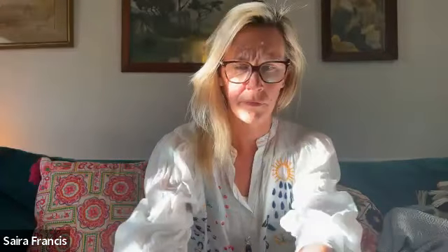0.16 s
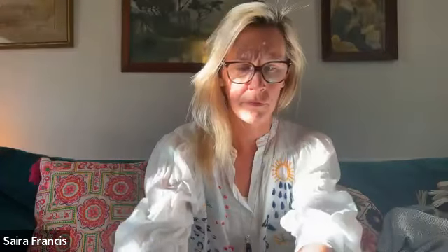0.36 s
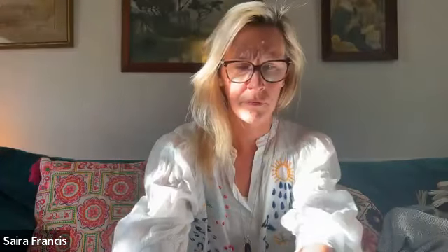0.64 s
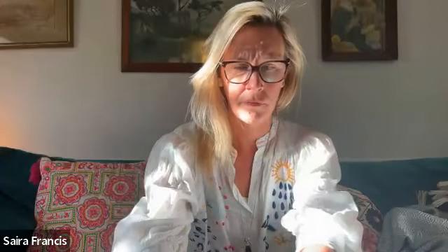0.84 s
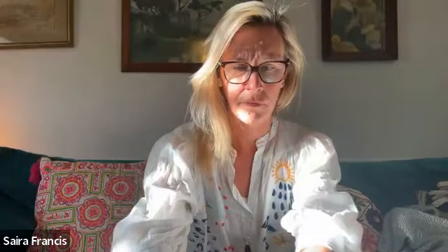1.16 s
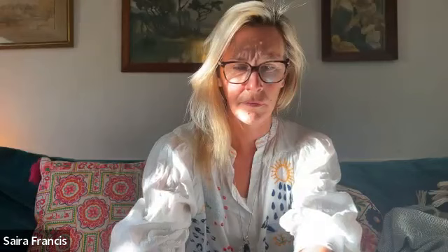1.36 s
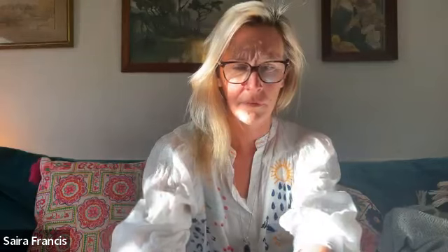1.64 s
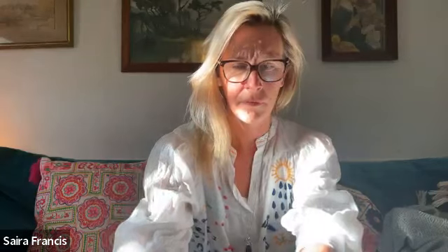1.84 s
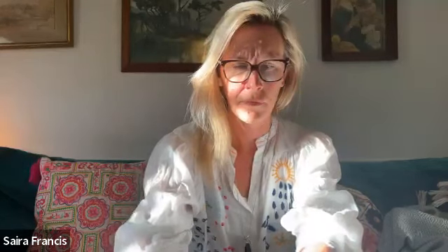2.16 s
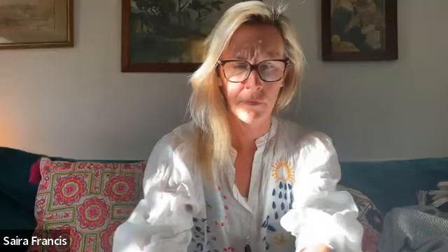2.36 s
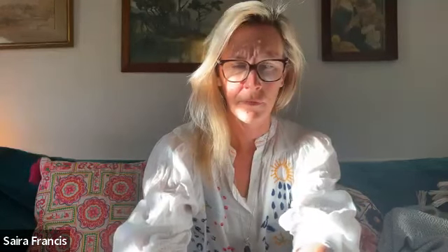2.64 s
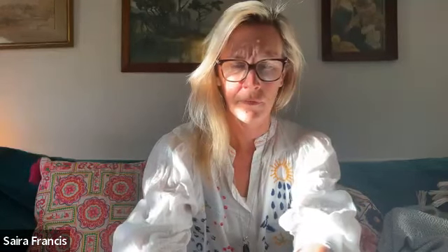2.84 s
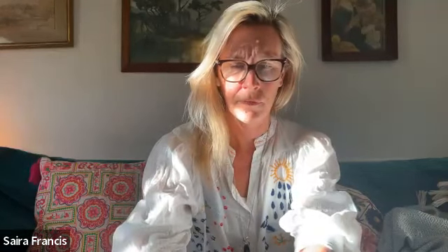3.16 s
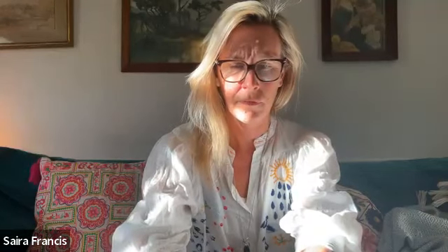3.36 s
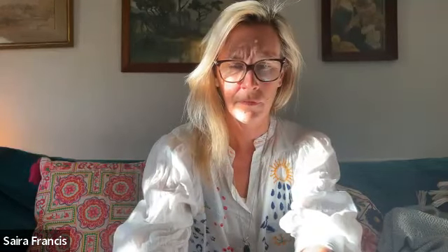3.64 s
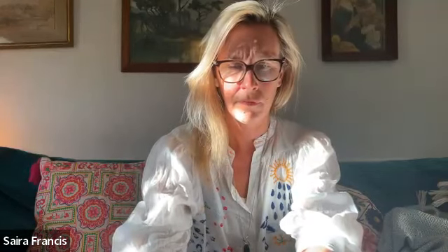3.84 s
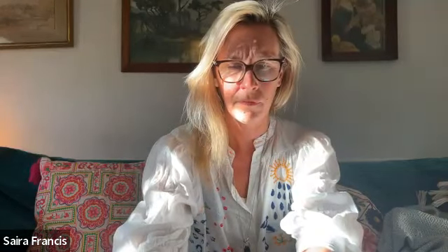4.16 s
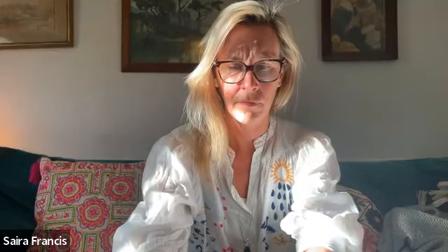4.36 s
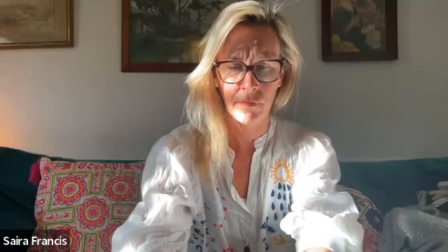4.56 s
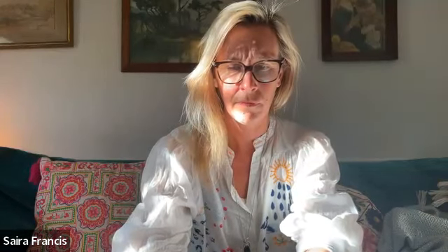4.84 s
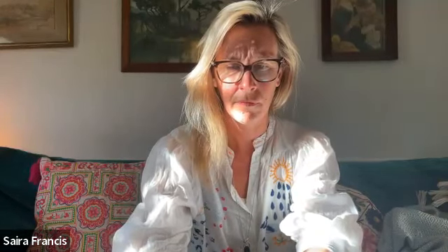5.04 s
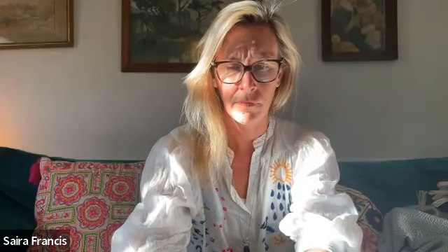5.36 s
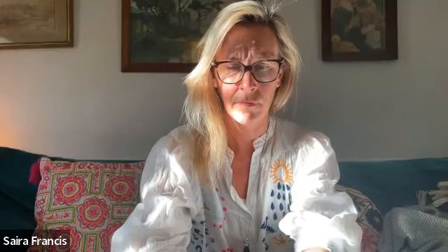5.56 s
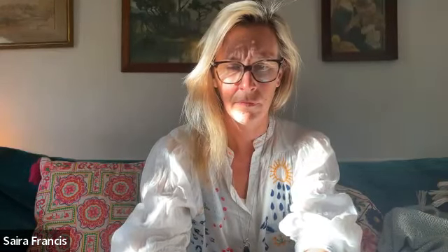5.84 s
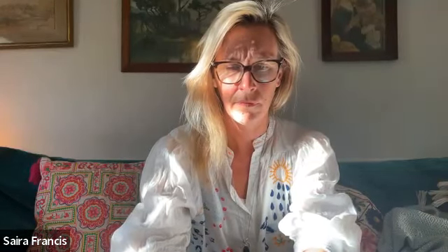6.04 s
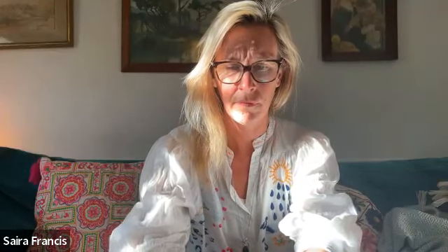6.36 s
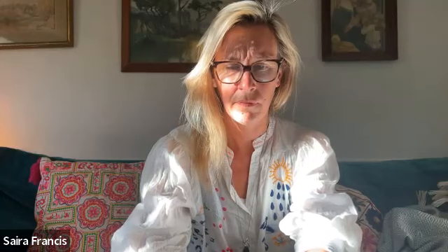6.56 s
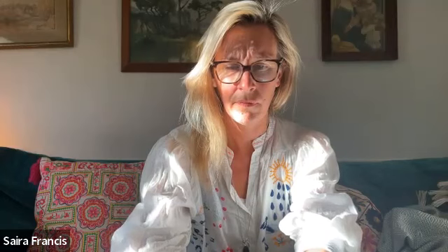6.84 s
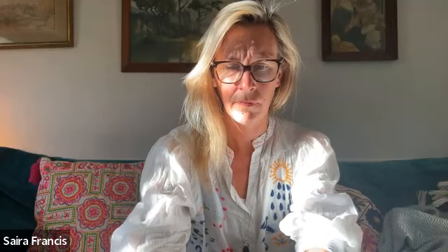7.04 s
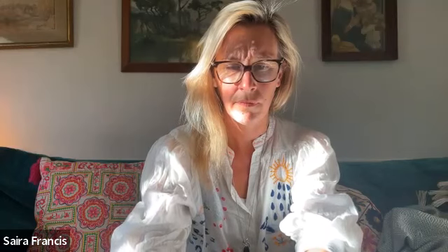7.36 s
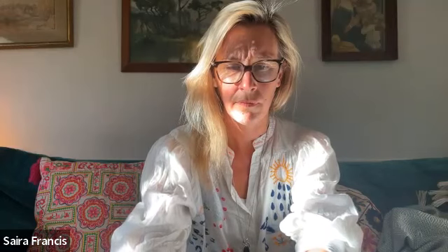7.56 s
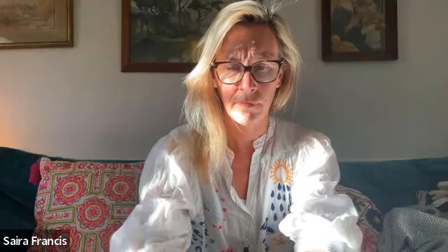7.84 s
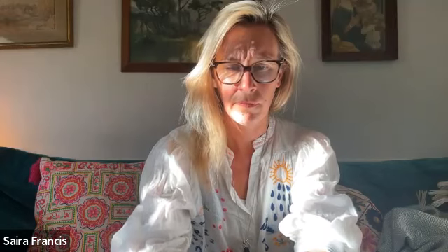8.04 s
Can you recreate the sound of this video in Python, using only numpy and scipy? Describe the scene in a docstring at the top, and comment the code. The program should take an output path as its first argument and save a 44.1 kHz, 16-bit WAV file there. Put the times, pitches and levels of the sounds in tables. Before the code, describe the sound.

A laptop keyboard is typed quickly up close, soft thumps and plastic clacks in bursts, broken by short runs of dry, evenly repeated clicks.

```python
"""Laptop keys typed close to the microphone in a small furnished room.
Ordinary keystrokes ring the modes of the hollow case and clack and rattle the caps with gritty noise.
Three times a crisp, dry key is tapped in a quick run, each tap built from a touch, press, lift and release.
Behind them lie a faint rapid ticking of narrow-band clicks that slowly runs down, and a quiet hum
of filtered noise."""
import sys
import numpy as np
from scipy import signal
from scipy.fft import rfft, irfft
from scipy.io import wavfile
from scipy.ndimage import uniform_filter1d

SR = 44100
rng = np.random.default_rng(int(sys.argv[2]) if len(sys.argv) > 2 else 0)


def unload_wav(signal):
    """Save mono or channel-first audio to the path in sys.argv[1] as 16-bit WAV at rate SR, clipped to [-1, 1]."""
    wavfile.write(
        sys.argv[1],
        SR,
        np.round(np.clip(np.atleast_2d(signal).T, -1, 1) * 32767).astype(np.int16),
    )


N = 361619

# Ordinary keystrokes. Each row: time of impact in seconds, strength in dB,
# hardness (cap clack over case thump) in dB, pitch of the struck spot in Hz.
STROKES = [(0.0315, -35.5, -5, 318), (1.632, -69, 11, 325), (1.7188, -38.5, 2.5, 328), (1.725, -40, 1, 292),
           (1.834, -35.5, 6.5, 403), (1.8644, -40.5, -6, 230), (2.1824, -30, -7.5, 280),
           (2.2625, -34.5, -12.5, 297), (2.3319, -34, -17.5, 240), (2.3897, -23, 2.5, 237),
           (2.4414, -36.5, -6, 258), (2.5, -33.5, -3.5, 260), (2.715, -38.5, 8, 396),
           (2.8033, -46.5, 12, 320), (2.8727, -29.5, -9, 313), (2.905, -40.5, -3, 253),
           (3.019, -26.5, 3, 272), (3.1186, -36, -4, 240), (3.2008, -36.5, -8, 420),
           (3.3166, -43.5, -3, 407), (3.581, -40.5, 7.5, 120), (3.6288, -35.5, -4.5, 320),
           (3.7042, -29, 4, 317), (3.7989, -38.5, -10.5, 350), (4.4975, -37.5, -6.5, 297),
           (4.5811, -30.5, 0.5, 335), (4.6132, -42, 2.5, 280), (4.6729, -36.5, -1.5, 344),
           (4.795, -33, -13, 244), (5.043, -34.5, 7, 371), (5.2077, -28.5, -7.5, 244),
           (5.3256, -31, -0.5, 364), (5.452, -28, -2, 253), (5.5393, -31, -4, 275), (5.6122, -30.5, 5, 506),
           (5.6552, -26, -7.5, 306), (5.7126, -29, -7.5, 286), (5.8139, -36, -4.5, 266),
           (5.9642, -49, 14, 408), (5.972, -34.5, -5, 424), (6.088, -40, 3.5, 344),
           (6.1147, -30.5, -2, 303), (6.213, -50.5, 9.5, 232), (6.2964, -24, -7.5, 370),
           (6.3491, -31, -0.5, 443), (6.4873, -29.5, -11, 215), (6.568, -42.5, 2, 285),
           (6.5818, -37.5, -6, 240), (6.6486, -23.5, -12, 363), (6.687, -19.5, -8, 296),
           (6.821, -27.5, -3.5, 290), (6.9384, -34.5, -3.5, 268), (7.603, -53.5, 10, 300),
           (7.8764, -44, 3, 403), (7.962, -24, -5.5, 394), (8.0244, -34.5, -14.5, 333),
           (8.1008, -27, -5, 280), (8.1541, -22, 2, 282)]
# Soft fingertips landing with barely a click. Each row: time of impact in seconds, strength in dB,
# pitch of the struck spot in Hz.
THUDS = [(1.4015, -35.5, 398), (1.5331, -39.5, 400), (1.9362, -36.5, 447), (2.551, -37, 312),
         (2.6653, -39, 360), (2.8272, -40, 290), (2.972, -40.5, 230), (3.087, -37, 224),
         (4.9111, -38.5, 265), (5.119, -37, 336), (5.426, -38.5, 287), (5.68, -31, 433),
         (6.0236, -34.5, 400), (6.198, -39.5, 376), (6.467, -39, 330), (7.663, -49, 168.5),
         (7.888, -34, 406)]
# Modes of the case under ordinary keys. Each row: frequency in Hz, level in dB, 60 dB decay in seconds.
CASE_MODES = [(113.4, -7, 0.18), (154.8, -1, 0.15), (192.5, -1, 0.078), (262.2, -4.5, 0.14),
              (354, -1, 0.045), (432.3, 3, 0.04), (539, 0, 0.039)]
# Colour of the cap clack. Each row: frequency in Hz, level in dB.
CAP_COLOUR = [(350, -13.5), (760, -9), (1500, -0.5), (1950, 0), (2800, -8), (4000, -15.5), (9000, -59.5)]
# Colour of the contact tick. Each row: frequency in Hz, level in dB.
TICK_COLOUR = [(1800, -47), (3600, -10), (5000, 2.5), (8000, 0.5), (12000, 2), (16000, -4)]
# Taps on the crisp key. Each row: time of bottoming out in seconds, travel before it in seconds,
# time held down in seconds, touch level in dB, press level in dB, release level in dB, brightness in dB.
TAPS = [(0.4809, 0.0039, 0.064, -25, -27.5, -28.5, 5), (0.6248, 0.0086, 0.067, -41.5, -31.5, -27.5, -3.5),
        (.7368, 0.02, .0832, -53, -36, -29, -0.5), (0.8783, 0.013, 0.07, -54.5, -36, -30, -0.5),
        (1.004, 0.015, 0.075, -54.5, -35, -28, 1), (1.1385, .0092, 0.09, -47, -32.5, -27.5, 8.5),
        (4.1167, .0039, 0.049, -27, -26.5, -22, -1.5), (4.2582, 0.016, .058, -33.5, -29, -26, 2.5),
        (4.383, 0.016, .0688, -37.5, -30.5, -23, -1.5), (7.2212, 0.0062, 0.059, -31, -30.5, -28.5, 1),
        (7.359, 0.011, 0.061, -39, -31, -32, 2.5), (7.4911, 0.015, 0.065, -34.5, -30, -28, 5.5)]
# Case modes under the crisp key. Each row: frequency in Hz, level in dB, 60 dB decay in seconds.
SNAP_CASE_MODES = [(160, -17, .05), (280, -13, .025), (415, -2, .032), (500, -2, .012), (785, -3, .018)]
# Modes of the crisp key's cap. Each row: frequency in Hz, level in dB, 60 dB decay in seconds.
SNAP_CAP_MODES = [(980, -6, 0.0056), (2051, 0, 0.0091), (2636, -1, 0.006), (4510, -1.5, 0.0045)]
# Colour of the crisp key's tick. Each row: frequency in Hz, level in dB.
SNAP_TICK_COLOUR = [(1800, -34), (3600, -14), (6000, 2), (16000, -8)]
# Colour of the room hum. Each row: frequency in Hz, relative level in dB per Hz.
HUM_COLOUR = [(18, -44), (30, -18), (100, 4.5), (632, -10), (2290, -11), (16000, -31.5)]

# a stroke's contact tick: level against the thump, growth with hardness, fall at higher-pitched spots
TICK_DB, TICK_PER_HARDNESS, TICK_DB_PER_OCTAVE, MID_SPOT_HZ = -4, 0.78, -6.5, 316
# a thud's dull clack against its thump, rising at higher-pitched spots; its trace of a tick against that clack
THUD_CLACK_DB, THUD_DB_PER_OCTAVE, THUD_TICK_DB = -9.5, 10, -22.5
# what each part of a tap excites: case thump dB, cap clack dB, contact tick dB, share of the tap's brightness
TOUCH, PRESS, RELEASE = (-10, 1, 4.5, -0.66), (1.5, -4.5, -8.5, 0.42), (-6, 1.74, -6.5, 1.47)
# the cap creaks faintly as the finger starts to lift: seconds before the release, and what it excites, as above
LIFT_S, LIFT = .016, (-35.5, -26.5, -25.5, -0.5)
TICKING_START_S, TICKING_PER_S, SLOWING_PER_S2 = .162, 27.05, .52
TICKING_DB, FADE_DB_PER_S = -66.5, 1.3
HUM_DB = -72.5
TOP_HZ = 16100
LEAD = 768  # samples ahead of the impact in each stroke
T = np.arange(8192) / SR  # time within one stroke, s


def keystrokes():
    """Each stroke thumps the case and clacks a cap, which rattles briefly on its hinge."""
    out = np.zeros(N)
    for s, thump_db, clack_db, tick_db, hz in blows():
        # the struck spot favours the case modes near its own pitch
        favour_db = -9 * np.abs(np.log2(np.array(CASE_MODES)[:, 0] / hz))
        case = ring(CASE_MODES, detune=0.055, weight_db=favour_db, spread=0.49)
        thump = unit(through(push(.0001), case))
        thump += undb(-8) * unit(band(shiver(0.015), 180, 500))
        # the louder the clack, the more the whole base rocks
        base = ring([(70, 0, 0.071)], detune=0.072)
        thump += undb(.5 * clack_db - 2.5) * unit(through(push(.001), base))

        # a hard stroke is one crack; a light one is mostly rattle
        looseness = min(undb(-.5 * (tick_db + 47.5)), 1)
        cluster = rattle(early_s=.007, late_s=.02, count=6)
        crack = contact(0.00029, 0.00028, grit=0.33)
        scuff = contact(.0025, 0.0027, grit=0.4)
        force = crack + undb(1.0) * scuff + looseness * cluster

        deck = shiver(0.016)
        # the less tick in a stroke, the duller its clack
        soft_db = np.clip(0.53 * (tick_db - clack_db - 0.5), -9, 0)  # per octave
        clack = colour(unit(force) + undb(-14.0) * deck, CAP_COLOUR, scatter_db=4, tilt_db=soft_db)
        tick = colour(force, TICK_COLOUR, scatter_db=4.5)
        add(out, s, undb(thump_db) * thump + undb(clack_db) * unit(clack) + undb(tick_db) * unit(tick))
    return out + undb(-19) * room(out, t60_s=0.18, gap_s=0.053, lo_hz=88.5, hi_hz=14000)


def blows():
    """Strokes and thuds as (s, thump dB, clack dB, tick dB, Hz); harder strokes are brighter."""
    for s, db, hardness_db, hz in STROKES:
        octaves = np.log2(hz / MID_SPOT_HZ)
        tick_db = TICK_DB + TICK_PER_HARDNESS * hardness_db + TICK_DB_PER_OCTAVE * octaves
        yield s, db, db + hardness_db, db + tick_db, hz
    for s, db, hz in THUDS:
        clack_db = db + THUD_CLACK_DB + THUD_DB_PER_OCTAVE * np.log2(hz / MID_SPOT_HZ)
        yield s, db, clack_db, clack_db + THUD_TICK_DB, hz


def rattle(early_s, late_s, count):
    """Small knocks of a loose cap, scattered around the impact, each with its own pitch."""
    out = np.zeros(len(T))
    for when, pitch, size in rng.random((count, 3)):
        delay = -early_s + when * (early_s + late_s)
        knock = contact(.0002, .0004, grit=.5)
        cap = ring([(1500 * 2 ** (3.1 * pitch), 0, .004)], detune=0)
        ping = unit(through(knock, cap))
        # knocks weaken away from the impact
        out += np.roll(knock + ping, int(delay * SR)) * undb(-10 * size - 530 * abs(delay))
    return unit(out)


def snaps():
    """The crisp key's clicks: quickly damped case and cap modes, gritty contact and a spring ping."""
    out, sent = np.zeros(N), np.zeros(N)
    for s, thump_db, clack_db, tick_db in tap_clicks():
        thump = unit(through(push(.00009), ring(SNAP_CASE_MODES, detune=0.022)))
        thump += undb(-7.0) * unit(band(shiver(0.0088), 80, 630, order=1))
        force = contact(.0003, .0005, grit=.4) + undb(-12) * contact(.003, .0015, grit=.5)

        # a clean impact rings the cap; grit crackles along with it
        cap = through(push(.00003), ring(SNAP_CAP_MODES, detune=.03))
        clack = unit(band(cap, 800, 6000)) + undb(-4.5) * unit(band(force, 1700, 4100))

        # brighter strokes ping the spring more, up to the level of the tick
        ping = unit(through(push(.00003), ring([(6600, 0, .005)], detune=.04)))
        tick = unit(colour(force, SNAP_TICK_COLOUR, scatter_db=3))
        tick = tick + undb(min(tick_db - clack_db, 0)) * ping
        add(out, s, undb(thump_db) * unit(thump) + undb(clack_db) * unit(clack) + undb(tick_db) * unit(tick))

        # the room hears the click from all sides, so a plain pulse feeds its smooth, broad tail
        add(sent, s, (undb(clack_db) + undb(tick_db)) * unit(push(.00003)))
    tail = room(sent, t60_s=.32, gap_s=.02, lo_hz=70, hi_hz=9000)
    # the tail's level flutters a little
    flutter = np.exp(7 * uniform_filter1d(rng.standard_normal(N), size=300))
    return out + undb(-32.5) * flutter * tail


def tap_clicks():
    """A tap's thin touch, dull press, faint lift and sharp release, as (s, thump dB, clack dB, tick dB)."""
    for s, travel_s, held_s, touch_db, press_db, release_db, bright_db in TAPS:
        parts = [(s - travel_s, touch_db, TOUCH),
                 (s, press_db, PRESS),
                 (s + held_s - LIFT_S, release_db, LIFT),
                 (s + held_s, release_db, RELEASE)]
        for at, db, (thump_db, clack_db, tick_db, share) in parts:
            yield at, db + thump_db, db + clack_db, db + tick_db + share * bright_db


def contact(rise_s, fall_s, grit):
    """Gritty force of one blow: plastic scuffs up to the impact, then chatters out."""
    t = T - LEAD / SR
    grains = rng.standard_normal(len(T)) * np.exp(grit * rng.standard_normal(len(T)))
    envelope = np.exp(np.where(t < 0, -(t / rise_s) ** 2, -t / fall_s))
    return unit(grains * envelope)


def push(width_s):
    """Smooth force of a blow: a bell-shaped pulse centred on the impact."""
    return np.exp(-((T - LEAD / SR) / width_s) ** 2)


def ring(modes, detune, weight_db=0, spread=0.21):
    """Damped modes of alternating sign; each blow shifts their pitch and strength."""
    hz, db, t60 = np.transpose(modes)
    shift, size = rng.standard_normal((len(hz), 2)).T
    sign = (-1) ** np.arange(len(hz))
    gain = sign * undb(db + weight_db) * (1 + spread * size)
    turns = np.outer(hz * np.exp(detune * shift), T)
    decay = np.exp(-np.log(1000) * T / t60[:, None])
    return gain @ (np.sin(2 * np.pi * turns) * decay)


def shiver(decay_s):
    """Many close, weak modes that ring together, as a short decaying noise after the impact."""
    return unit(np.roll(rng.standard_normal(len(T)) * np.exp(-T / decay_s), LEAD))


def room(x, t60_s, gap_s, lo_hz, hi_hz):
    """Diffuse noise tail that builds up over the first reflections, then decays."""
    t = np.arange(SR) / SR
    decay, buildup = np.exp(-np.log(1000) * t / t60_s), 1 - np.exp(-t / gap_s)
    tail = rng.standard_normal(SR) * decay * buildup
    return band(through(x, tail / np.linalg.norm(tail)), lo_hz, hi_hz, order=1)


def ticking():
    """Small, evenly spaced ticks with one narrow resonance, wavering, slowing and fading."""
    t = np.arange(N) / SR
    rate = (TICKING_PER_S - SLOWING_PER_S2 * t) * (t > TICKING_START_S)
    cycles = np.cumsum(rate) / SR
    times = np.flatnonzero(np.diff(np.floor(cycles))) / SR  # one tick per whole cycle
    waver_db = 8 * uniform_filter1d(rng.standard_normal(N // 1000), size=4)
    out = np.zeros(N)
    for at, off_db in zip(times, waver_db):
        tick = unit(band(push(.00008), 2100, 2520))
        add(out, at, tick * undb(TICKING_DB - FADE_DB_PER_S * at + off_db))
    return out


def hum():
    """Steady, dull room noise: white noise shaped by the hum's colour."""
    x = colour(rng.standard_normal(N), HUM_COLOUR)
    return x / np.std(x) * undb(HUM_DB)


def colour(x, points, scatter_db=0, tilt_db=0):
    """Shape by (Hz, dB) points, each moved by chance, with an extra slope in dB per octave."""
    hz, db = np.transpose(points)
    db = db + scatter_db * rng.standard_normal(len(hz)) + tilt_db * np.log2(hz / hz[0])
    bins = np.maximum(np.arange(len(x) // 2 + 1) * SR / len(x), 1)
    gain = undb(np.interp(np.log(bins), np.log(hz), db))
    return irfft(rfft(x) * gain, len(x))


def band(x, lo_hz, hi_hz, order=2):
    """Butterworth band-pass."""
    edges = [lo_hz, min(hi_hz, .47 * SR)]
    return signal.sosfilt(signal.butter(order, edges, "band", fs=SR, output="sos"), x)


def through(x, response):
    """Pass a sound through an impulse response."""
    return signal.fftconvolve(x, response)[:len(x)]


def unit(x):
    """Scale to the energy of 10 ms at full level."""
    return x * np.sqrt(.01 * SR / np.sum(x ** 2))


def undb(db):
    """Decibels to gain."""
    return 10 ** (np.asarray(db) / 20)


def add(out, s, x):
    """Mix in a stroke whose impact, LEAD samples into it, falls at time s."""
    i = max(int(s * SR) - LEAD, 0)
    out[i:i + len(x)] += x[:max(N - i, 0)]


def scene():
    """Both kinds of key over the ticking and the quiet room, in one channel."""
    return (keystrokes() + snaps() + ticking() + hum())[None]


def record(dry):
    """The small microphone loses the deep bass; the top is cut steeply."""
    thin = signal.sosfilt(signal.butter(2, 42, "high", fs=SR, output="sos"), dry)
    return signal.sosfilt(signal.ellip(8, .2, 70, TOP_HZ, fs=SR, output="sos"), thin)


dry = scene()
out = record(dry)
unload_wav(out)
```